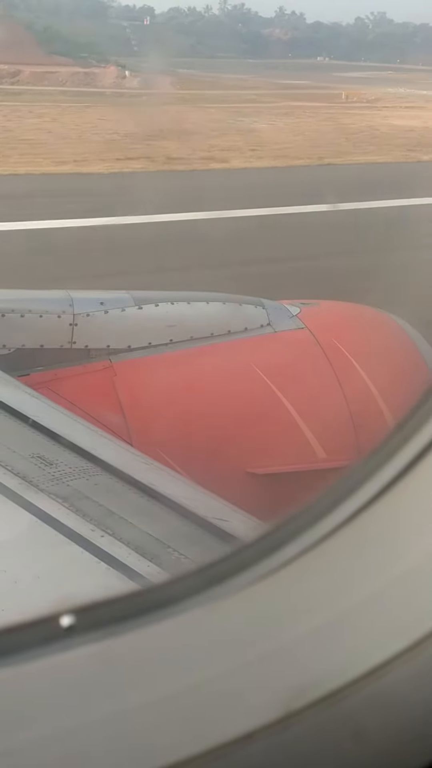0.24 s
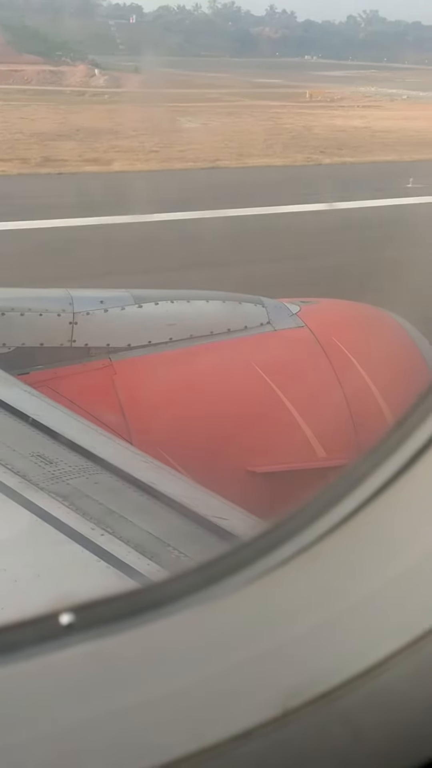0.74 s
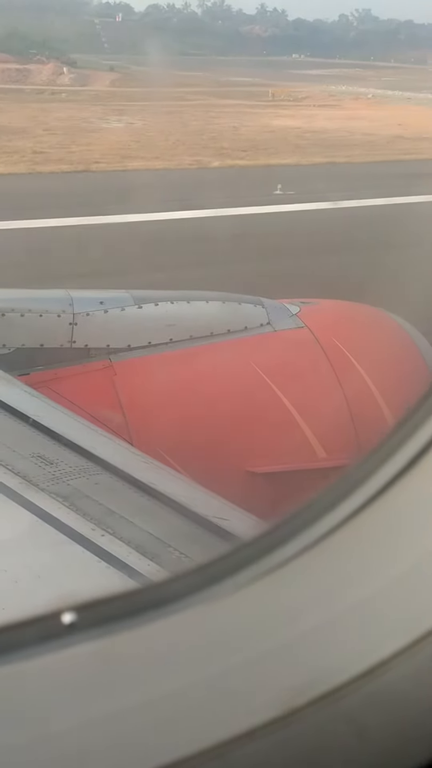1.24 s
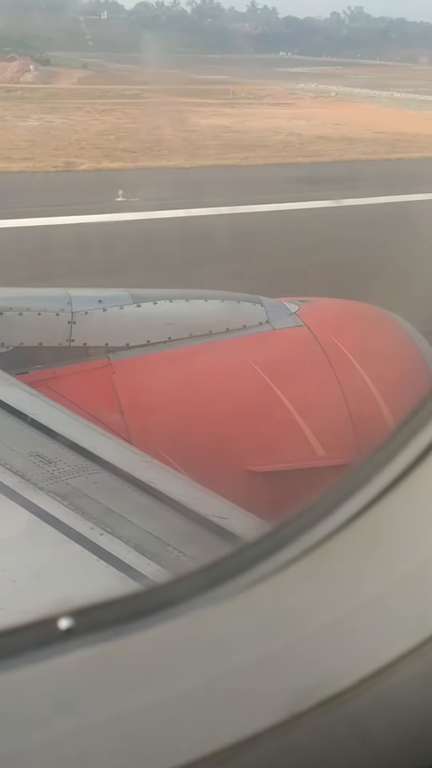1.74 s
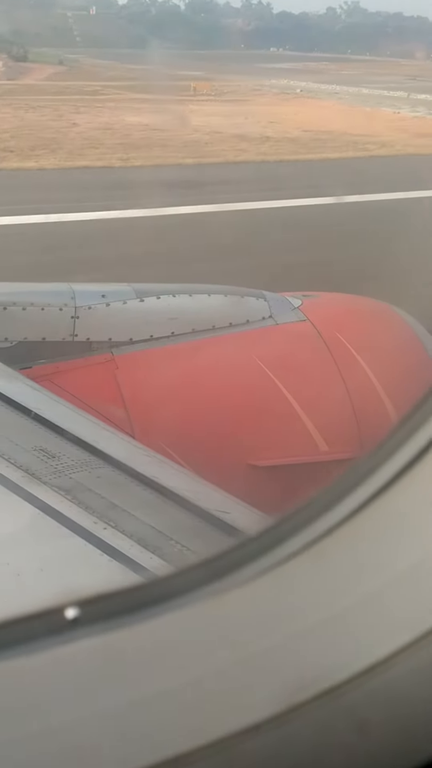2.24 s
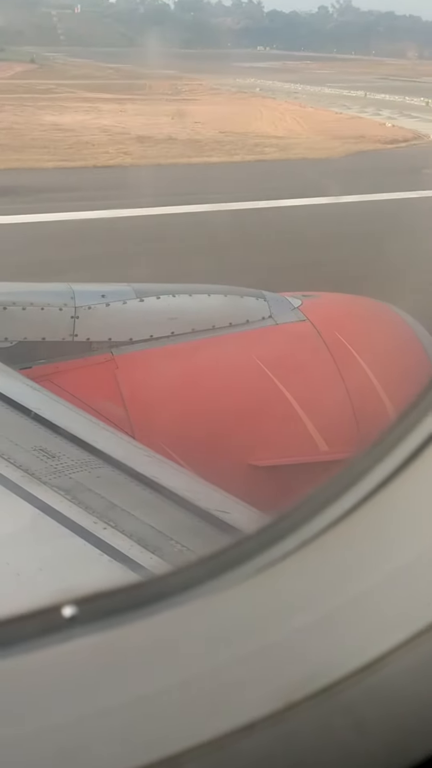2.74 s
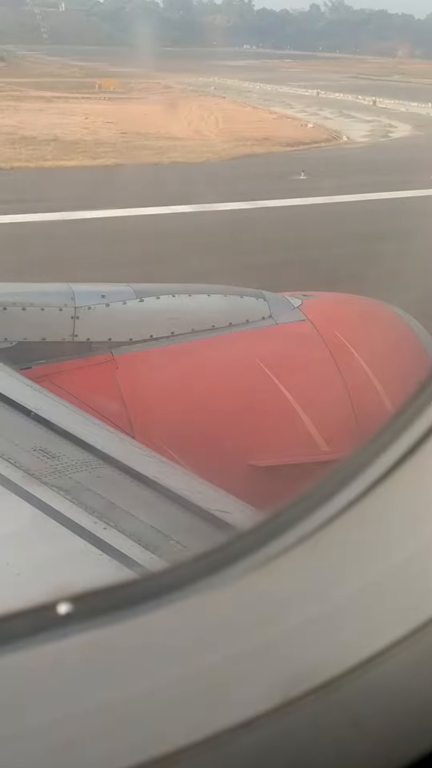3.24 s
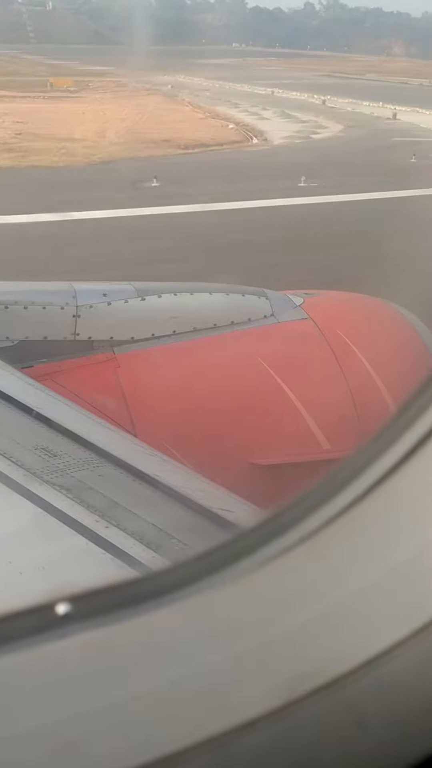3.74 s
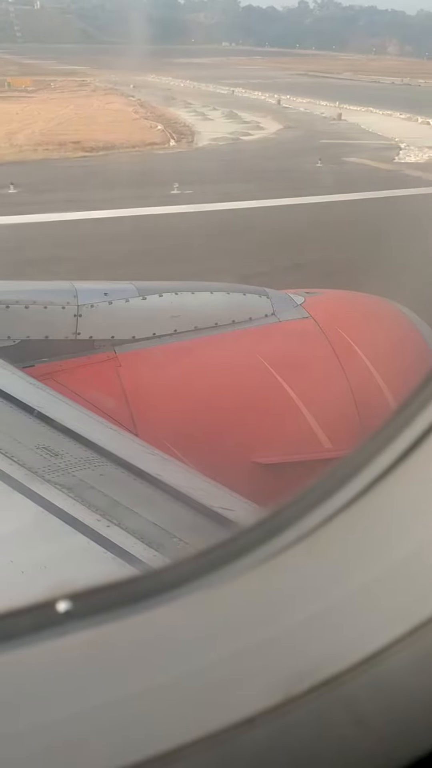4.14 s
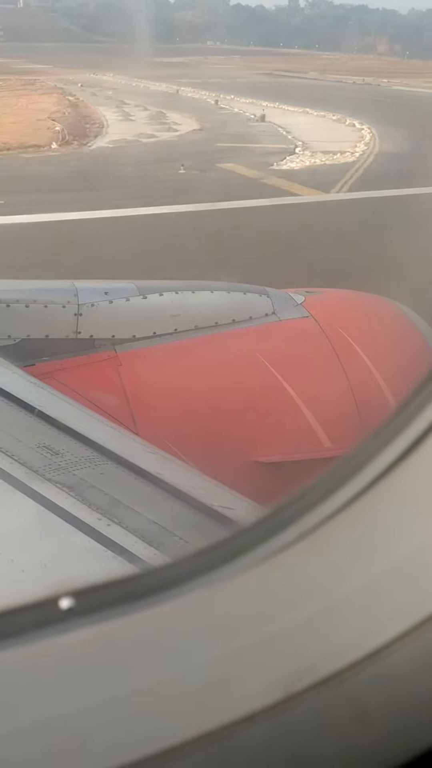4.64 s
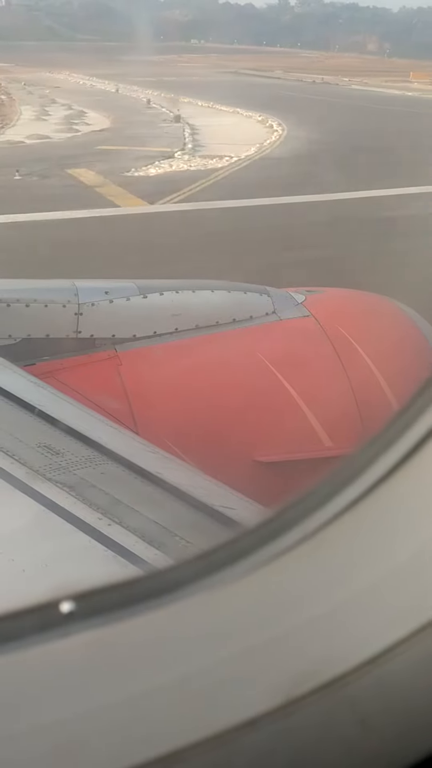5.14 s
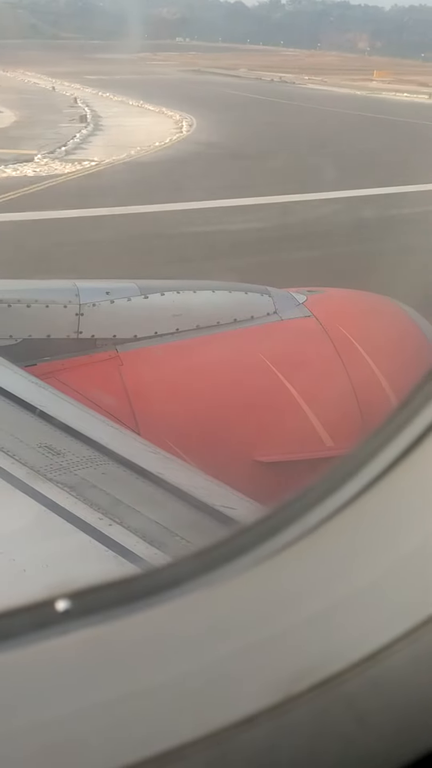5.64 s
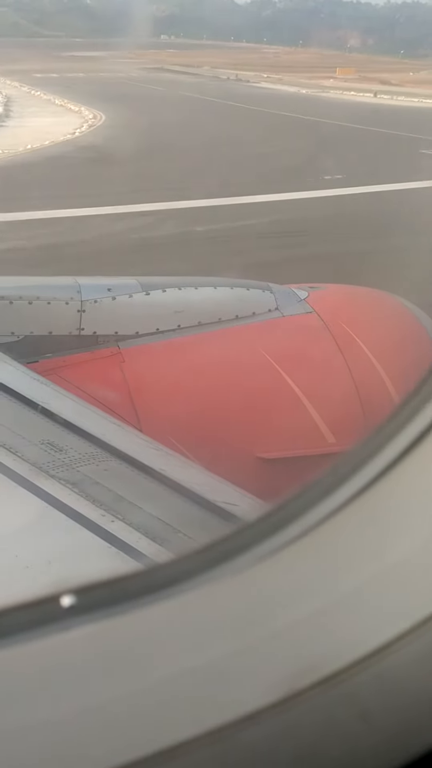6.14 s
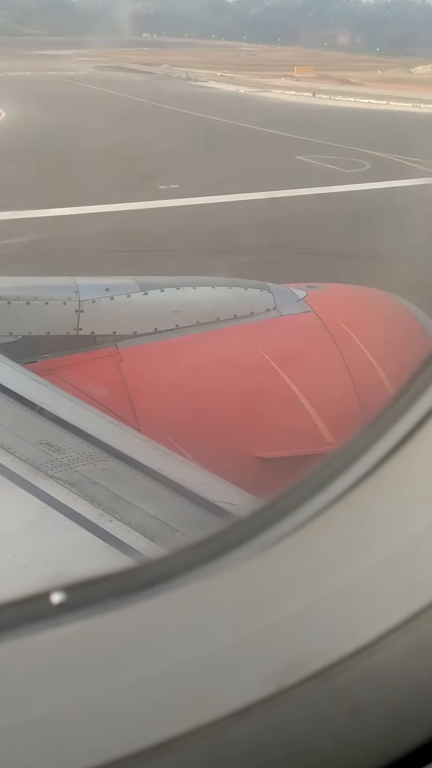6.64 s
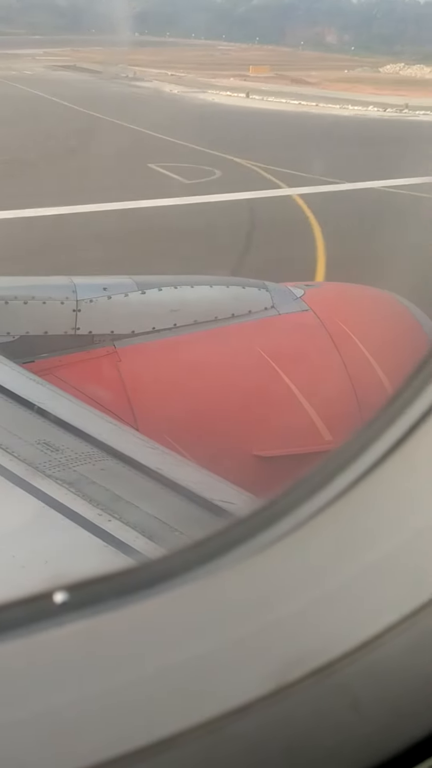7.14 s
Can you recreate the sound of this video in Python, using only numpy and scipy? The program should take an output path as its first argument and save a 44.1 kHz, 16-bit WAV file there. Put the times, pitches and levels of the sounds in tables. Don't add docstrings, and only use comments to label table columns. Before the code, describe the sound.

A landed airliner slows along the runway, heard inside the cabin on a handheld phone. A low engine hum throbs about six times a second, swelling around the middle and gradually dropping in pitch. Steady electrical hums and bassy airframe rumble lie around it. Treble hiss dulls after four seconds, while dry plastic rattles, a few dull panel knocks and joint thumps cluster in the second half and a falling whine emerges late.

```python
import sys
import numpy as np
from scipy import signal
from scipy.io import wavfile
from scipy.ndimage import uniform_filter1d

SR = 44100
rng = np.random.default_rng(int(sys.argv[2]) if len(sys.argv) > 2 else 0)


def nominal_scale(level):
    x = np.asarray(level, float) / 20
    return 10 ** x


def digitize_waveform(pressure):
    field = np.atleast_2d(pressure).T
    bounded = np.clip(field, -1, 1)
    quanta = np.round(bounded * 32767).astype(np.int16)
    wavfile.write(sys.argv[1], SR, quanta)


N = 326781


def evened(x):
    return x / np.sqrt(np.mean(x ** 2) + 1e-20)


def read(points, hz):
    f, value = np.transpose(points)
    return np.interp(np.log(hz + 1), np.log(f + 1), value)


def curves(rows, t):
    s, *columns = np.transpose(rows)
    return [np.interp(t, s, c) for c in columns]


def band(x, low_hz, high_hz):
    return signal.sosfilt(signal.butter(4, [low_hz, high_hz], "bandpass", fs=SR, output="sos"), x)


def drift(width_hz):
    pole = np.exp(-16 * np.pi * max(width_hz, .1) / SR)
    steps = (N + SR) // 16 + 1
    kicks = rng.standard_normal(steps) + 1j * rng.standard_normal(steps)
    slow = signal.lfilter([1], [1, -pole], kicks)
    z = np.interp(np.arange(N) / 16, np.arange(steps) - SR // 16, slow)
    return z / np.sqrt(np.mean(abs(z) ** 2))


def tone(turns, db, fuzz=0., width_hz=3., lead=0., pan_db=0.):
    z = nominal_scale(db) * np.sqrt(2) * np.exp(2j * np.pi * turns) * (1 + fuzz * drift(width_hz))
    left = (z * np.exp(1j * lead)).real * nominal_scale(pan_db / 2)
    right = z.real / nominal_scale(pan_db / 2)
    return np.array([left, right])


def noise_pair(size, gain_db, same, patchy_db, flicker_db):
    frames, hz = 4 * N // size + 5, np.fft.rfftfreq(size, 1 / SR)
    t = np.arange(frames) * size / 4 / SR
    a, b, c, d, patches = rng.standard_normal((frames, len(hz), 5)).T
    patches = evened(uniform_filter1d(uniform_filter1d(patches, size=10, axis=0), size=8, axis=1))
    flicker = evened(uniform_filter1d(rng.standard_normal(frames), size=6))
    likeness = same(hz)[:, None]
    left = a + 1j * b
    right = likeness * left + np.sqrt(1 - abs(likeness) ** 2) * (c + 1j * d)
    z = np.array([left, right]) * nominal_scale(gain_db(hz, t) + patchy_db * patches + flicker_db * flicker)
    return signal.istft(z, nperseg=size, noverlap=3 * size // 4)[1][:, :N] * np.sqrt(SR / size)


# time in seconds, near shaft in Hz, lead of the far shaft in Hz.
SHAFTS = [(0, 183.1, 6.927), (1.25, 177.2, 6.426), (2.5, 171.6, 5.925), (4.4, 163.2, 5.934),
          (4.65, 162.1, 5.552), (4.85, 161.3, 6.722), (5.2, 159.7, 6.686), (6, 156.5, 5.895),
          (6.75, 153.9, 5.543), (7.41, 152.1, 3.395)]
# Hz, level in dB.
NEAR_PATH = [
    [(152.7, -28), (153.3, -22.5), (162, -20.5), (166, -16), (171.5, -19), (172.2, -30), (177.2, -26.5),
     (178, -37)],
    [(352.5, -36), (356, -50), (364, -44), (374, -62), (386, -41), (400, -40), (410, -45), (422, -33)],
    [(704, -57), (716, -63), (729, -55), (738, -68), (766, -61), (810, -66), (826, -62), (845, -53)],
    [(1450, -74), (1475, -68), (1500, -75), (1700, -77)],
]
FAR_PATH = [
    [(158.8, -31), (160.3, -24.5), (163.5, -25), (165.3, -21.5), (167.8, -26), (169.3, -35), (178, -36),
     (183, -46)],
    [(362, -33), (371, -38), (389, -45), (394, -38), (402, -38.5), (409, -33), (428, -42), (435, -65)],
    [(726, -56), (744, -50), (763, -57), (775, -54), (786, -59), (797, -72), (830, -69), (870, -64)],
    [(1450, -74), (1475, -65), (1500, -72), (1525, -65), (1560, -71), (1620, -80), (1670, -72), (1730, -78)],
]
PUMP_GEAR, FAR_START_TURNS = 2.315, .326
NULL_HZ, NULL_WIDTH_HZ = 172.2, .35


def engines():
    near_hz, lead_hz = curves(SHAFTS, np.arange(N) / SR)
    near_sign = -np.tanh((near_hz - NULL_HZ) / NULL_WIDTH_HZ)
    near = (near_hz, 0, NEAR_PATH, near_sign)
    far = (near_hz + lead_hz, FAR_START_TURNS, FAR_PATH, 1)
    out = np.zeros((2, N))
    for hz, start_turns, path, sign in (near, far):
        turns = np.cumsum(hz) / SR + start_turns
        shaft_db = read(path[0], hz) + .4
        out += sign * tone(turns, shaft_db, fuzz=.04, width_hz=8, lead=.12, pan_db=-1.0)
        for k in range(3):
            order = PUMP_GEAR * 2 ** k
            pump_db = read(path[k + 1], order * hz) + 0.54
            out += tone(order * turns, pump_db, fuzz=0.19, width_hz=5, lead=.3 * 2 ** k, pan_db=.5)
    return out


# time in seconds, pitch in Hz, level in dB.
WHEEL_WHINE = [(0, 600, -48), (.9, 594, -50), (2.7, 585, -50), (3.9, 573, -52), (5.1, 545, -52),
               (5.7, 527, -66), (6, 515, -58), (6.2, 512, -70), (6.4, 495, -46), (6.7, 467, -45),
               (7.12, 425, -37.5), (7.41, 396, -40)]


def wheel_whine():
    hz, db = curves(WHEEL_WHINE, np.arange(N) / SR)
    return tone(np.cumsum(hz) / SR, db, fuzz=.12, width_hz=3, pan_db=1.5)


# start in seconds, end in seconds, start in Hz, end in Hz, level in dB.
GLIDES = [
    (5.12, 5.62, 466, 424, -42),
    (6.4, 7.4, 335, 302, -41),
    (4.2, 5.2, 331, 325, -38),
    (0.3, 1.7, 170, 167, -36),
    (-.6, 1.4, 1830, 1822, -62),
]


def glides():
    t = np.arange(N) / SR
    out = np.zeros((2, N))
    for start, end, start_hz, end_hz, db in GLIDES:
        swell = np.sin(np.pi * np.clip((t - start) / (end - start), 0, 1))
        turns = np.cumsum(np.interp(t, [start, end], [start_hz, end_hz])) / SR
        out += swell * tone(turns, db, fuzz=.15, width_hz=3.8)
    return out


HUM_HZ = [90, 288, 505, 843, 915, 1009, 1040, 1317, 1515, 1825, 2690, 2777]
# level in dB, width in Hz, left over right in dB.
HUMS = [(-42, 4, 0), (-50, 9, 0), (-51, 2, 2), (-64, 2, 1), (-64, 3, 1), (-63, 1, 1), (-68, 1, 1),
        (-72, 1, 1), (-75, 2, 2), (-72, 9, 0), (-74, 1, 12), (-75, 2, 10)]


def hums():
    t = np.arange(N) / SR
    out = np.zeros((2, N))
    for hz, (db, width_hz, pan_db) in zip(HUM_HZ, HUMS):
        turns = hz * t + rng.random()
        out += 1.2 * tone(turns, db, fuzz=.55, width_hz=width_hz, lead=hz / 600, pan_db=pan_db)
    return out


# Hz, level in dB per Hz.
RUMBLE = [(22, -33.5), (38, -6), (60, 13), (75, -5), (120, 5), (200, -4), (285, -4), (400, -10), (472, -12),
          (586, -21), (660, -23), (841, -23.5), (1000, -30), (1500, -32.5)]
# Hz, correlation from -1 to 1.
RUMBLE_SAME = [(40, .999), (90, 0.99), (200, 0.89), (350, 0.86), (520, 0.33), (750, -0.2), (1000, -0.52),
               (1500, -0.91)]
# time in seconds, added thump in dB.
JOINTS = [
    (2.47, 5.6),
    (3.9, 5),
    (5.74, 5.4),
    (6.11, 2.5),
    (6.86, 6.9),
]
JOINT_S = 0.039
RUMBLE_DB, RUMBLE_DB_PER_S = -32, -0.28
THUMP_DB, THUMP_DB_PER_S = -9.5, 0.67


def rumble():
    def gain_db(hz, t):
        joints_db = sum(db * np.exp(-((t - s) / JOINT_S) ** 2) for s, db in JOINTS)
        thump_db = THUMP_DB + THUMP_DB_PER_S * t + joints_db
        bass = np.clip((150 - hz[:, None]) / 30, 0, 1)
        level_db = RUMBLE_DB + RUMBLE_DB_PER_S * t + thump_db * bass
        rolloff_db = 30 * np.log2(np.maximum(hz / 1500, 1))
        return (read(RUMBLE, hz) - rolloff_db)[:, None] + level_db

    def same(hz):
        return np.clip(read(RUMBLE_SAME, hz), -1, 1)
    return nominal_scale(-17.0) * noise_pair(2048, gain_db, same, patchy_db=0.8, flicker_db=0.5)


# Hz, level in dB per Hz.
LEFT_PORT = [(900, -68), (1250, -79), (1550, -78), (1950, -74.5), (2600, -76), (3300, -75), (4050, -72.5),
             (4700, -78), (5500, -87.5), (6400, -95), (7600, -106), (9100, -94), (10200, -104),
             (11800, -99)]
RIGHT_PORT = [(900, -73.5), (1250, -83), (1550, -80), (1950, -81), (2600, -85), (3300, -87), (4050, -84.5),
              (4700, -90), (5500, -94.5), (6400, -92.5), (7600, -90), (9100, -84), (10200, -89),
              (11800, -94)]
# time in seconds, hiss change in dB.
THRUST = [(0, 4), (2, 3), (4, 1.5), (4.5, -2), (5.5, -5.5), (6.4, -6.5), (7.41, -9.5)]
# Hz, share of the change.
THRUST_SHARE = [(1200, 0.17), (2000, 0.32), (4000, 0.43), (5500, .6), (9000, 0.8), (12000, 1.1)]
PORT_LAG_S = .00051


def hiss():
    def gain_db(hz, t):
        low_cut_db = 24 * np.log2(np.maximum(1200 / (hz + 1), 1))
        ports_db = np.array([read(LEFT_PORT, hz), read(RIGHT_PORT, hz)]) - low_cut_db
        return ports_db[:, :, None] + read(THRUST_SHARE, hz)[:, None] * curves(THRUST, t)[0]

    def same(hz):
        return .2 * np.exp(2j * np.pi * hz * PORT_LAG_S)
    return nominal_scale(-2.5) * noise_pair(512, gain_db, same, patchy_db=1.11, flicker_db=0.65)


# start in seconds, peak in dB, 2-5 kHz part in dB, T60 in seconds.
RATTLES = [(1.1219, -39.5, 7, 0.13), (1.1997, -49, 3, 0.16), (1.502, -46, 8.5, 0.23), (1.9345, -48, 10, .2),
           (2.5094, -31, 0.5, 0.093), (3.3388, -43.5, 1, 0.14), (3.797, -45, 5, .2),
           (4.194, -43.5, 4.5, 0.22), (4.3188, -38.5, -1, .06), (4.4144, -46, -1, 0.073),
           (4.4538, -43, 6, 0.11), (4.531, -46.5, 15.5, 0.052), (4.6392, -44.5, -5, 0.084),
           (4.6698, -40.5, -11, 0.16), (5.2297, -41.5, 6.5, 0.085), (5.452, -41.5, 2.5, 0.17),
           (5.533, -39, 3.5, 0.035), (5.577, -35, 4, 0.029), (5.611, -34, 11.5, .16),
           (5.759, -47, -9, 0.079), (5.7932, -42, -16, .045), (5.8671, -46, 9, 0.055),
           (6.348, -44, 8.5, 0.089), (6.6338, -45, 13.5, 0.056), (6.733, -43.5, -3, 0.044),
           (6.8857, -50.5, 16, .05), (6.9486, -42, 3, .054), (7.1601, -43, 10.5, 0.035),
           (7.1937, -43.5, 8, .098), (7.2725, -48.5, 8.5, 0.11)]
RATTLE_RISE_S = .004
PAN_DB, PAN_PER_DB = -7, 0.1
TICK_COUNT, TICK_DB, TICK_T60_S = 18, -54, .06


def rattles():
    out, t = np.zeros((2, N + SR)), np.arange(SR // 4) / SR
    ticks = [(a * N / SR, TICK_DB + 6 * b, 20 * c - 8, TICK_T60_S)
             for a, b, c in rng.random((TICK_COUNT, 3))]
    for s, db, middle_db, t60 in RATTLES + ticks:
        pan_db = PAN_DB + PAN_PER_DB * middle_db
        ring_hz = rng.uniform(2860, 4220)
        jumps_db = 3 * rng.standard_normal(len(t) // 50 + 1).repeat(50)[:len(t)]
        grit = rng.standard_normal((2, len(t))) * nominal_scale(jumps_db)
        shape = nominal_scale(db - 60 * t / np.clip(t60, .02, .2)) * np.minimum(t / RATTLE_RISE_S, 1)
        top = evened(band(grit, 7800, 10400) + 0.75 * band(grit, 6000, 11800))
        top *= nominal_scale([[pan_db / 2 - 14], [-pan_db / 2 - 7.0]])
        middle = band(grit, 2870, 4650) + 0.32 * band(grit, 4600, 7000) + 0.14 * band(grit, 1500, 3000)
        middle = evened(middle + 0.46 * band(grit, 0.98 * ring_hz, 1.07 * ring_hz))
        middle *= nominal_scale(middle_db + np.array([[-2.5], [-11]]))
        out[:, round(s * SR):][:, :len(t)] += (top + middle) * shape
    return out[:, :N]


# start in seconds, level in dB, pitch in Hz, T60 in seconds.
KNOCKS = [
    (4.187, -31.5, 760, 0.082),
    (4.454, -37, 935, 0.071),
    (4.457, -40, 2250, 0.057),
    (5.231, -31.5, 740.2, 0.048),
    (6.979, -51.5, 2270, 0.034),
    (7.161, -45, 1600, .03),
    (7.298, -42.5, 3100, .05),
    (7.364, -40, 3640, 0.041),
]


def knocks():
    out, t = np.zeros((2, N + SR)), np.arange(SR // 4) / SR
    for s, db, hz, t60 in KNOCKS:
        shape = nominal_scale(db - 60 * t / t60) * np.minimum(t / 0.0035, 1)
        noise = evened(band(rng.standard_normal((2, len(t))), 0.6 * hz, 1.17 * hz))
        out[:, round(s * SR):][:, :len(t)] += shape * (np.sin(2 * np.pi * hz * t) + 0.69 * noise)
    return out[:, :N]


def scene():
    tones = wheel_whine() + glides() + hums()
    return engines() + tones + rumble() + hiss() + rattles() + knocks()


# Hz, change in dB.
STEP_COLOUR = [(900, 0), (1200, 10), (1700, 6), (2200, 0), (5300, -3), (6200, 3), (7100, -6), (11000, -5)]
HOP, BINS, GRID = 1024, 560, 793
STEP_DB, STEP_SHARE, STEP_SPREAD_DB = -51, .4, 3
STEP_OVER_DB = 9


def coarse_steps(x):
    n, k = np.arange(2 * HOP), np.arange(BINS)
    window = np.sin(np.pi * (n + .5) / (2 * HOP))
    basis = np.cos(np.pi / HOP * np.outer(n + HOP / 2 + .5, k + .5))
    basis *= np.sqrt(2 / HOP) * window[:, None]
    lead = 2 * HOP - GRID
    blocks = np.pad(x, ((0, 0), (lead, -(N + lead) % HOP + HOP))).reshape(len(x), -1, HOP)
    lines = np.concatenate([blocks[:, :-1], blocks[:, 1:]], axis=2) @ basis
    t = (np.arange(lines.shape[1]) * HOP - lead + HOP) / SR
    spread = rng.standard_normal(lines.shape[:2] + (BINS // 16,)).repeat(16, axis=2)
    power = uniform_filter1d(uniform_filter1d(lines ** 2, size=48, axis=2), size=3, axis=1)
    local = np.sqrt(power + 1e-12)
    colour_db = read(STEP_COLOUR, k * SR / 2 / HOP)
    step_db = STEP_DB + colour_db + STEP_SHARE * curves(THRUST, t)[0][:, None]
    step = np.minimum(nominal_scale(step_db), nominal_scale(STEP_OVER_DB) * local) * nominal_scale(STEP_SPREAD_DB * spread)
    rounded = np.sign(lines) * np.floor(abs(lines) / step + .4) * step
    frames = rounded @ basis.T
    blocks = frames[:, 1:, :HOP] + frames[:, :-1, HOP:]
    return blocks.reshape(len(x), -1)[:, lead - HOP:][:, :N]


def top_cut(x):
    return signal.sosfilt(signal.butter(12, 12080, fs=SR, output="sos"), x)


def record(dry):
    return top_cut(coarse_steps(dry))


dry = scene()
out = record(dry)
digitize_waveform(out)
```